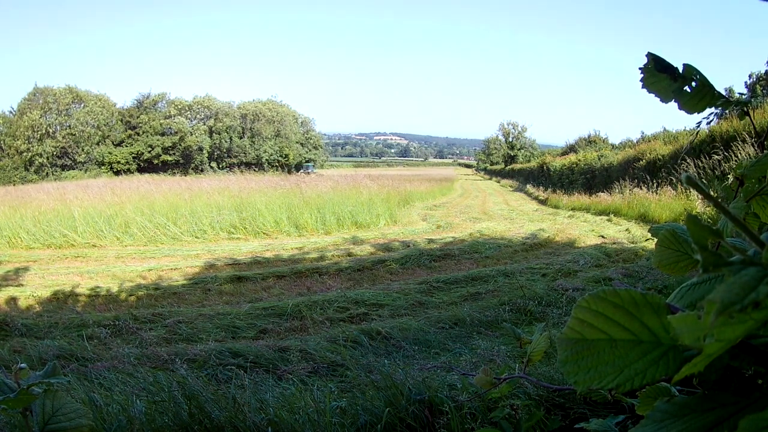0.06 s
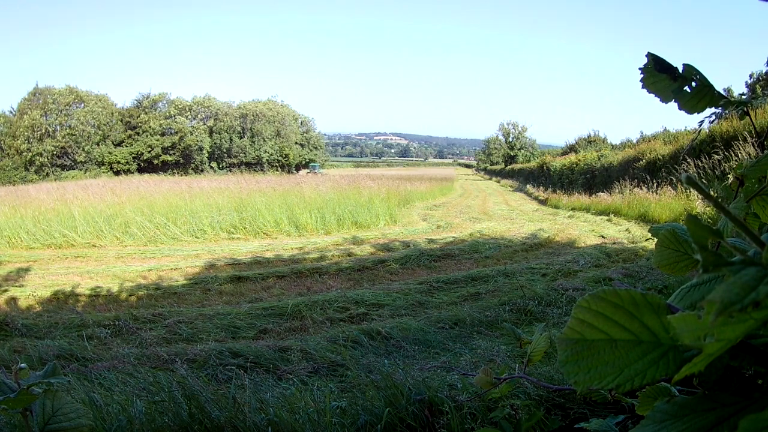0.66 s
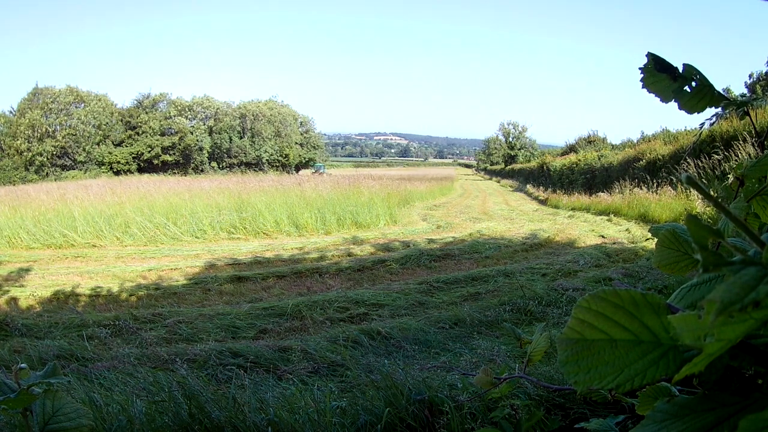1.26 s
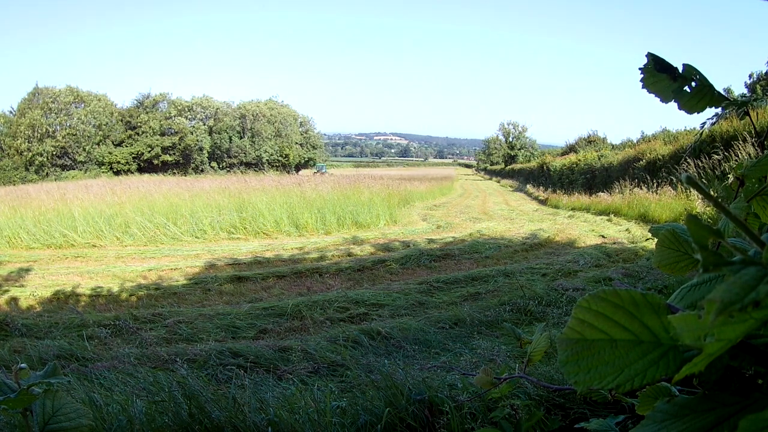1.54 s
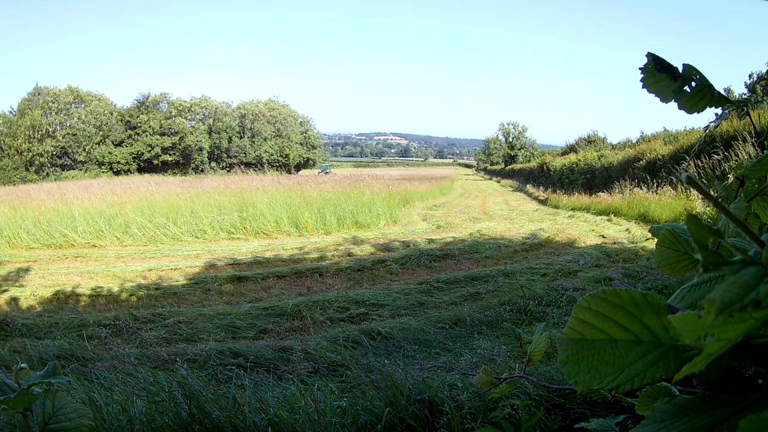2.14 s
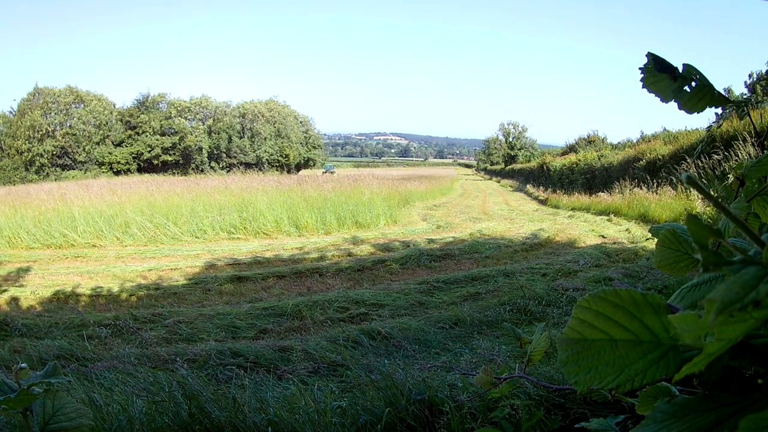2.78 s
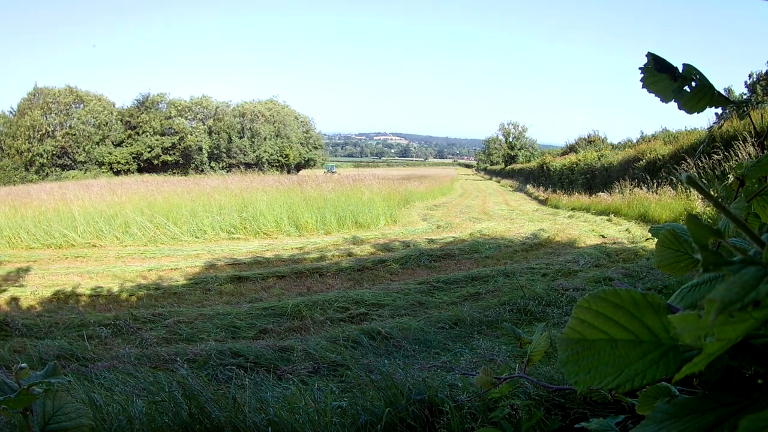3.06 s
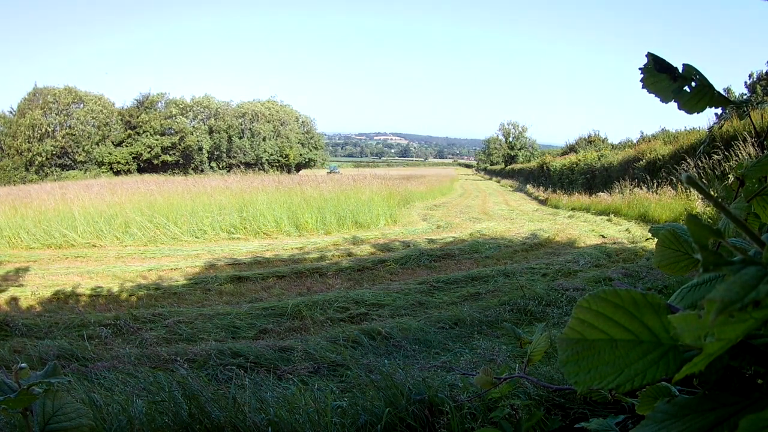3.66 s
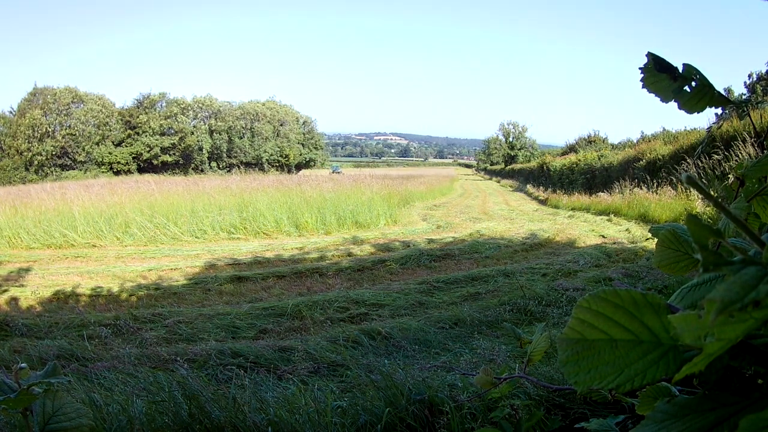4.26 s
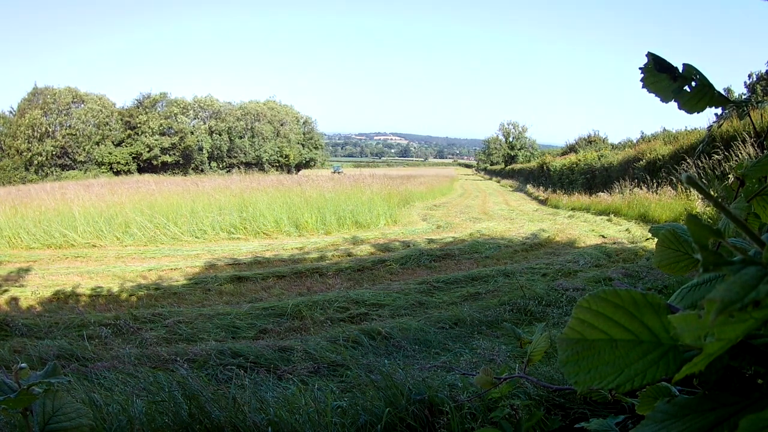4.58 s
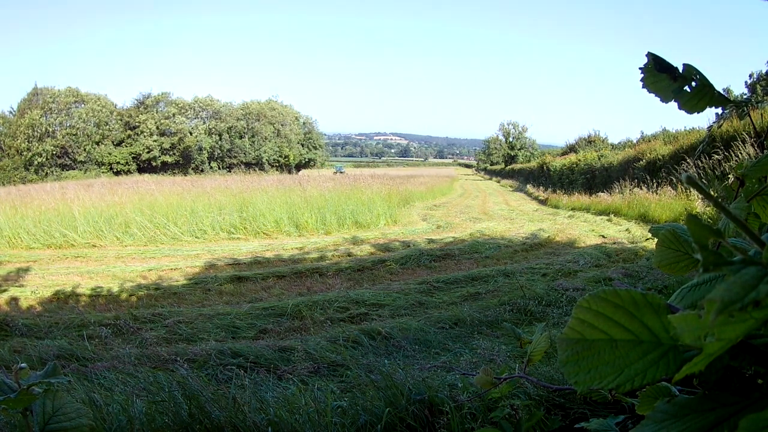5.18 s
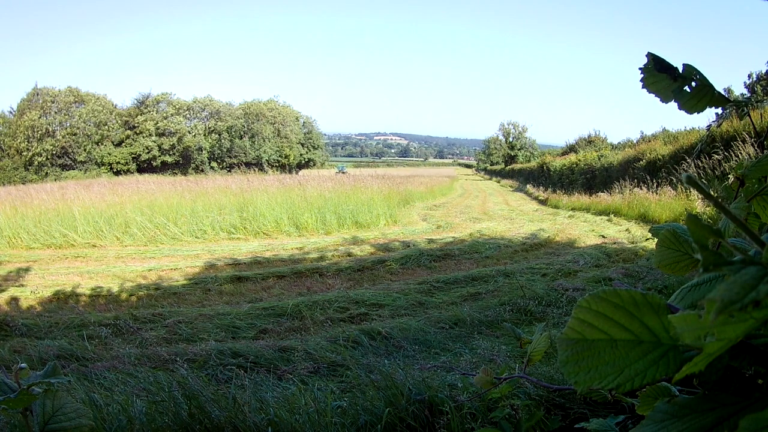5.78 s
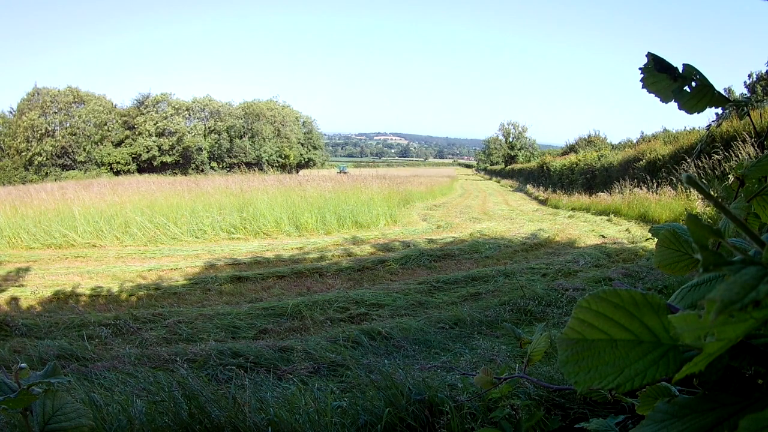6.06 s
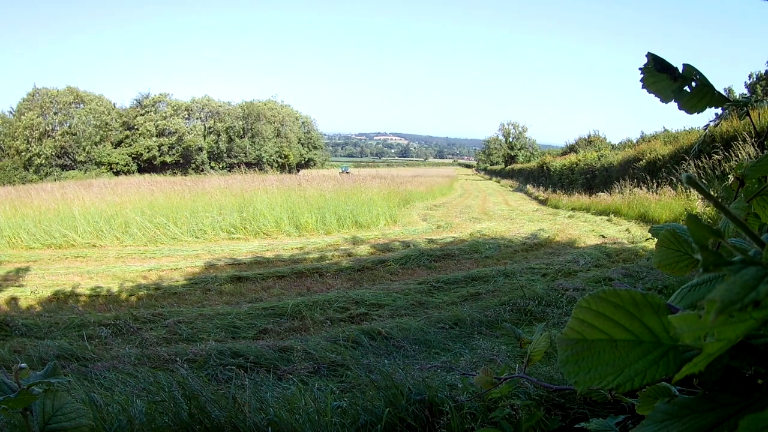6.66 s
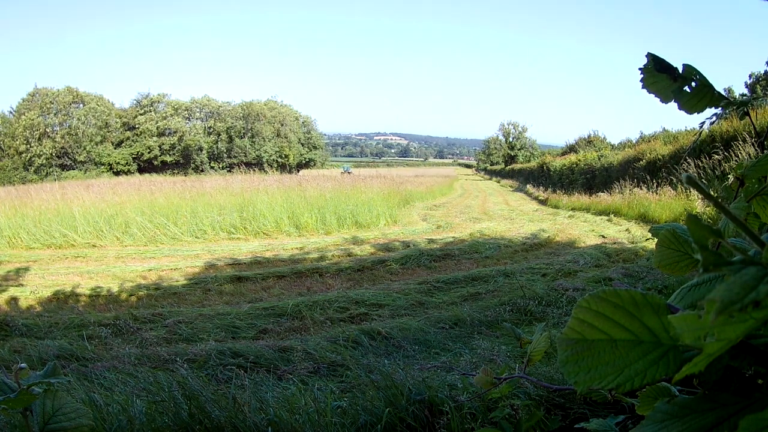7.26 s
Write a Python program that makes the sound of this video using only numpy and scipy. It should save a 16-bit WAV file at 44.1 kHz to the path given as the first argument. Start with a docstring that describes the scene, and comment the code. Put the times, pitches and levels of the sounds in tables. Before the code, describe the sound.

A distant tractor drones steadily while mowing a meadow, with a faint high cricket rasp nearby.

```python
"""A diesel tractor mows hay at the far end of a meadow on a still summer day.
Its exhaust throbs with firing tones and puffs of gas, under the rush and clatter of the mower's blades
and a faint gear whine; the machinery swells and fades with distance and gives one dull knock.
A bush cricket rasps its wings in the hedge nearby, just above the steady hiss of the microphone."""
import sys
import numpy as np
from scipy import signal
from scipy.fft import rfft, irfft, next_fast_len
from scipy.io import wavfile

SR = 44100
rng = np.random.default_rng(int(sys.argv[2]) if len(sys.argv) > 2 else 0)


def digitize_waveform(pressure):
    """Quantize a signal to 16-bit integers and store it at the path in sys.argv[1].

    Rows of a 2-D input are taken as channels; values are limited to [-1, 1].
    """
    field = np.atleast_2d(pressure).T
    bounded = np.clip(field, -1, 1)
    quanta = np.round(bounded * 32767).astype(np.int16)
    wavfile.write(sys.argv[1], SR, quanta)


N = 323253
TIME = np.arange(N) / SR


def from_db(db):
    """Decibels to gain."""
    return 10 ** (np.asarray(db) / 20)


def rms_one(x):
    """Scale to unit power."""
    return x / np.sqrt(np.mean(x ** 2) + 1e-20)


def automation(points):
    """A curve over the whole scene: straight lines between (t/s, value) points."""
    return np.interp(TIME, *np.transpose(points))


def drift(rate_hz):
    """Smooth random modulation of unit power: coarse noise through two one-pole low-passes."""
    hop, settle = 40, 2000
    pole = np.exp(-2 * np.pi * rate_hz * hop / SR)
    coarse = rng.standard_normal(N // hop + settle + 2)
    slow = signal.lfilter([1], [1, -2 * pole, pole * pole], coarse)[settle:]
    return np.interp(np.arange(N) / hop, np.arange(len(slow)), rms_one(slow))


def noise(spectrum):
    """Steady noise of unit power, coloured by (f/Hz, level/dB) points."""
    size = next_fast_len(N)
    hz = np.maximum(np.fft.rfftfreq(size, 1 / SR), 1)
    points_hz, points_db = np.transpose(spectrum)
    colour = from_db(np.interp(np.log(hz), np.log(points_hz), points_db, left=-70, right=-70))
    return rms_one(irfft(rfft(rng.standard_normal(size)) * colour, size)[:N])


def scattered(phase, blur_hz):
    """A tone arriving by many shifting paths: its level and phase wander at random."""
    return rms_one(drift(blur_hz) * np.cos(phase) + drift(blur_hz) * np.sin(phase))


def exhaust_drone(phase, firing_hz, swell_db, base_db=-40.5, working_hz=77.3):
    """The firing tone and its octave run in step; weaker tones beat against them and make a throb."""
    # tones of the unequal cylinders and driven parts: multiple of the firing rate, level/dB re base_db
    side_orders = [(5 / 6, -27), (7 / 6, -20.5), (8 / 6, -28), (10 / 6, -18), (7 / 4, -18)]
    firing_db = base_db + .5 * (firing_hz - working_hz)   # louder as the engine runs faster
    drone = from_db(firing_db + .24 * drift(4.6)) * np.sin(phase)
    octave = (2, -18 + .52 * swell_db, 0)
    fifth = (3 / 2, -7, np.pi / 2)   # in quadrature it spaces alternate firings unevenly
    sides = [(multiple, db, rng.uniform(0, 2 * np.pi)) for multiple, db in side_orders]
    for multiple, db, offset in [octave, fifth] + sides:
        drone += from_db(base_db + db + .86 * drift(1.5)) * np.sin(multiple * phase + offset)
    return np.sqrt(2) * drone


def exhaust_rumble(phase, swell_db, ring, puff_depth=.19):
    """Turbulent gas leaves the stack in puffs, with every other firing the stronger."""
    # deep colour of the gas flow: f/Hz, relative level/dB
    gas_colour = [(20, -11), (40, -5), (55, -0.5), (80, 1.5), (130, -1), (170, 1), (210, -5.5),
                  (250, -15.5), (340, -16), (450, -33), (800, -40)]
    puffs = 1 + puff_depth * np.sin(phase / 2)
    return from_db(-51.5 + .49 * swell_db - 4 * ring) * noise(gas_colour) * puffs


def mower(phase, swell_db, ring, turns_per_firing=.685, chop_depth=.038, hiss_lift_db=2.5):
    """The rotor hums; its blades churn the air, shake the deck and hiss through the grass."""
    # narrow resonance of the hood: f/Hz, relative level/dB
    hood_colour = [(230, -35), (272, -6.5), (295, -0.5), (310, -11), (350, -33)]
    # midrange rush of churned air: f/Hz, relative level/dB
    air_colour = [(200, -19), (320, -12), (430, -11.5), (550, -6.5), (700, -2), (850, -1), (1100, -3),
                  (1300, -5.5), (1600, -22.5), (2600, -38), (4000, -41)]
    # metallic clatter of the deck: f/Hz, relative level/dB
    deck_colour = [(600, -21), (1000, -6.5), (1250, -3), (1440, 2.5), (1520, -2), (1620, -5), (1700, -6),
                   (1830, -11), (1960, -8.5), (2080, -16), (2300, -18.5), (2600, -33), (3200, -31)]
    # bright hiss of blades in grass: f/Hz, relative level/dB
    blade_colour = [(900, -10), (1600, 1.5), (2300, 3), (2600, 0.5), (3050, -4.5), (3500, 1.5), (3900, 0.5),
                    (4450, -6.5), (5200, 0.5), (5600, 0), (6200, -11), (7200, -11), (8000, -24)]
    # fader ride of that hiss: t/s, level/dB before the lift
    blade_ride = [(0, -63), (0.5, -63.7), (0.95, -67.6), (1.35, -67.5), (1.9, -70.5), (3.2, -71),
                  (4.6, -70.0), (5.6, -67.1), (6.35, -69.0), (6.8, -67), (7.33, -69)]
    rotor_phase = turns_per_firing * phase + .48 * drift(.99)
    hum = np.sqrt(2) * from_db(-63 + 1.9 * swell_db) * np.sin(rotor_phase)
    booming = np.exp(-((TIME - .87) / .71) ** 2 / 2)   # the hood booms early on, then dies away
    boom = from_db(-74 + .21 * swell_db + 12.5 * booming) * noise(hood_colour)
    rush = from_db(-55.3 + .94 * swell_db - 2 * ring) * noise(air_colour)
    clatter = from_db(-59.5 + 1.43 * swell_db + 2 * ring) * noise(deck_colour)
    hiss = from_db(automation(blade_ride) + hiss_lift_db) * noise(blade_colour)
    chop = 1 + chop_depth * np.cos(rotor_phase)   # a slight pulse each turn
    flutter = from_db(.42 * drift(15))
    return hum + boom + (rush + clatter + hiss) * chop * flutter


def gear_whine(phase, swell_db, ring):
    """Mesh tones follow the engine speed, blurred on their way over the field."""
    # gear mesh tones: multiple of the firing rate, relative level/dB
    mesh_orders = [(10.93, 0), (14.55, -3.5), (17.6, -4), (18.15, -2), (21.8, -8.5), (29.5, -14)]
    tones = sum(from_db(db) * scattered(multiple * phase, blur_hz=9.7) for multiple, db in mesh_orders)
    return from_db(-71.5 + 1.3 * swell_db + 8 * ring) * tones


def background(air_db=-64, hiss_db=-71):
    """A bed of dull open-air noise and even microphone hiss, with a few thin whistles."""
    # low murmur of open country: f/Hz, relative level/dB
    country_colour = [(20, 3), (30, 6), (60, -2), (200, -1), (300, -2.5), (420, 0.5), (600, -3),
                      (1000, -10), (2500, -33)]
    # microphone hiss: f/Hz, relative level/dB
    hiss_colour = [(100, 14.5), (3000, 4), (6800, 1), (7800, -1.5), (8600, 1.5), (9200, 2.2), (9800, -1),
                   (11100, 0), (13000, 2)]
    # steady whistles at the top: f/Hz, level/dB
    whistle_tones = [(9126, -99), (10207, -103), (10267, -101), (10508, -94), (10568, -105)]
    whistles = sum(from_db(db) * np.sin(2 * np.pi * hz * TIME + .5 * drift(2.4))
                   for hz, db in whistle_tones)
    air = from_db(air_db) * noise(country_colour)
    hiss = from_db(hiss_db) * noise(hiss_colour)
    return air + hiss + np.sqrt(2) * whistles


def soft_chirps(loud_chirps, gap_s=.23, jitter_s=.038, soft_db=-83.5, spread_db=3):
    """Cues (t/s, level/dB) for the loosely even chirps in the pauses between the loud ones."""
    chirps = []
    for beat, (late, strong) in enumerate(rng.standard_normal((64, 2))):
        at_s = beat * gap_s + jitter_s * late
        in_pause = all(abs(at_s - loud_s) > gap_s / 2 for loud_s, _ in loud_chirps)
        if in_pause and at_s < TIME[-1]:
            chirps.append((at_s, soft_db + spread_db * strong))
    return chirps


def cricket(half_width_s=.018, lift_db=1.5, tooth_db=2.5, chorus_db=-85):
    """Each wing stroke is a short high rasp, grainy from the file's teeth, over a faint far chorus."""
    # the strong wing strokes: t/s, level/dB before the lift
    loud_chirps = [(.074, -75.5), (.198, -76), (.388, -75), (.586, -76.5), (.824, -76), (.976, -79),
                   (1.127, -75), (1.716, -79), (4.026, -77.5), (4.174, -79), (4.361, -77), (4.58, -78),
                   (4.806, -78), (4.956, -78), (5.123, -78), (5.322, -81), (7.107, -78), (7.238, -77)]
    # narrow treble band of the wings: f/Hz, relative level/dB
    wing_colour = [(9000, -35), (9750, -11), (10000, 1), (10300, -2), (10600, -1), (10850, -6),
                   (11100, -18), (12000, -42)]
    strokes = sum(from_db(db) * np.exp(-np.abs((TIME - at_s) / half_width_s) ** 3 / 2)
                  for at_s, db in loud_chirps + soft_chirps(loud_chirps))
    rasp = rms_one(noise(wing_colour) * from_db(tooth_db * drift(250)))
    chorus = from_db(chorus_db + 3.1 * drift(17)) * noise(wing_colour)
    return from_db(lift_db) * strokes * rasp + chorus


def knock():
    """One dull knock: a single tone that dies at once."""
    # the hit: t/s, level/dB, f/Hz, t60/s
    hits = [(3.974, -40, 850, .016)]
    out = np.zeros(N)
    for at_s, db, hz, t60 in hits:
        age = np.maximum(TIME - at_s, 0)
        decay_db = np.minimum(60 * age / t60, 200)
        out += from_db(db - decay_db) * np.sin(2 * np.pi * hz * age)
    return out


def scene(usual_db=-54):
    """One engine speed drives exhaust, mower and gears; their layers ride one swell, some more deeply."""
    # firing rate, picking up as the load eases: t/s, f/Hz
    engine_speed = [(0, 76.73), (1, 77.25), (4.3, 77.35), (6.2, 79.05), (7.33, 78.73)]
    # how loudly the mower carries over the field: t/s, level/dB
    carry_level = [(0, -48), (0.65, -48.5), (1.15, -48), (1.45, -50.8), (2.1, -51.8), (2.35, -52),
                   (3.1, -54.2), (3.9, -54.5), (4.5, -56), (6.1, -53.5), (7.33, -56)]
    firing_hz = automation(engine_speed)
    phase = 2 * np.pi * np.cumsum(firing_hz) / SR
    swell_db = automation(carry_level) - usual_db
    # late on the metal rings out: whine and clatter come forward, rush and rumble duck
    start_s, attack_s, hold_s, release_s = 4.6, 1.3, 1.14, 1.5
    ring = np.interp(TIME, np.cumsum([start_s, attack_s, hold_s, release_s]), [0, 1, 1, 0])
    exhaust = exhaust_drone(phase, firing_hz, swell_db) + exhaust_rumble(phase, swell_db, ring)
    machinery = mower(phase, swell_db, ring) + gear_whine(phase, swell_db, ring) + knock()
    return (exhaust + machinery + cricket() + background())[None]


def record(dry, cutoff_hz=12000):
    """A steep low-pass takes off the very top."""
    return signal.sosfilt(signal.ellip(12, .1, 70, cutoff_hz, fs=SR, output="sos"), dry)


dry = scene()
out = record(dry)
digitize_waveform(out)
```